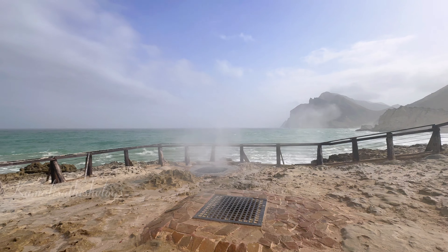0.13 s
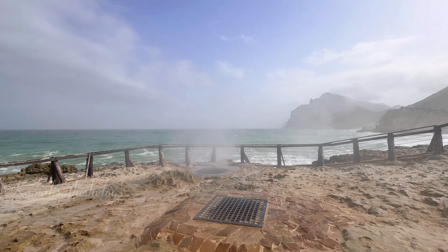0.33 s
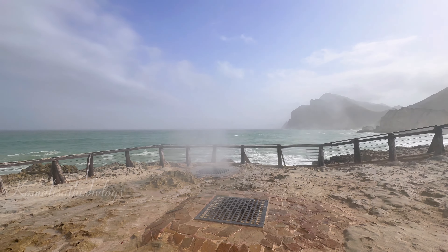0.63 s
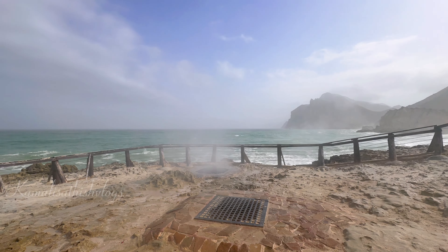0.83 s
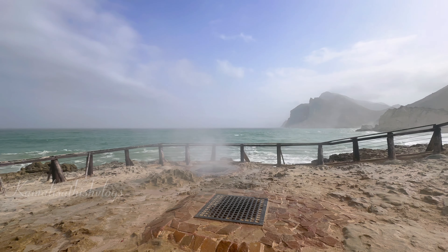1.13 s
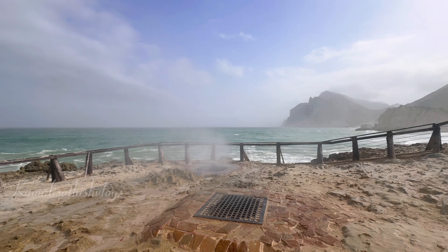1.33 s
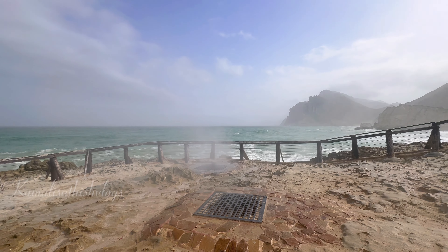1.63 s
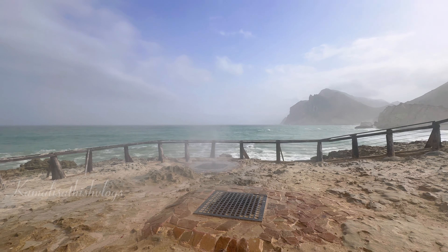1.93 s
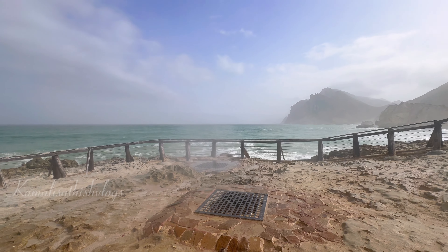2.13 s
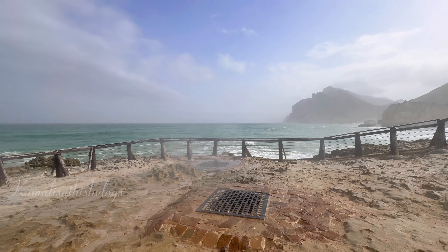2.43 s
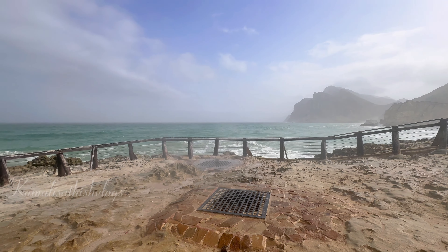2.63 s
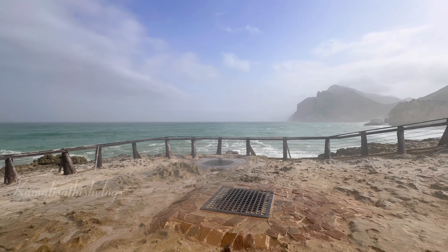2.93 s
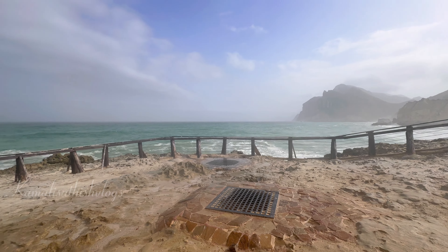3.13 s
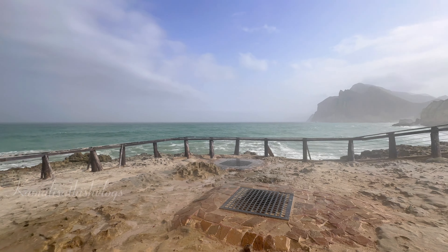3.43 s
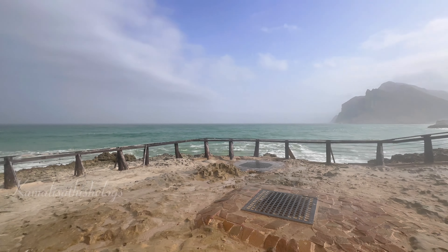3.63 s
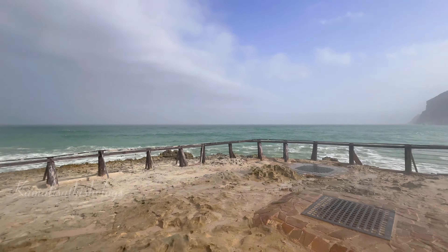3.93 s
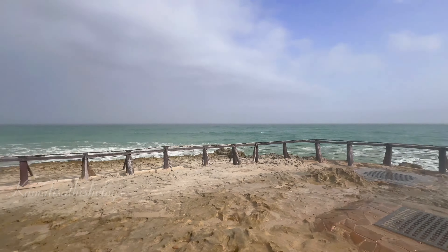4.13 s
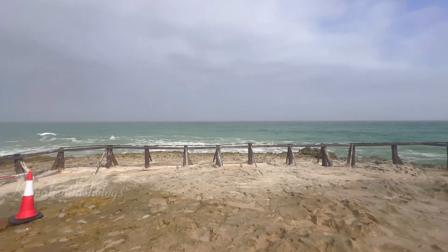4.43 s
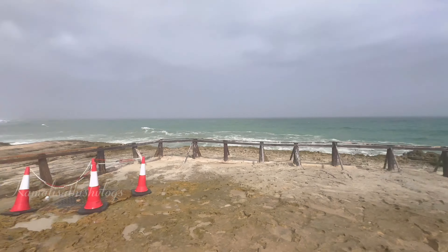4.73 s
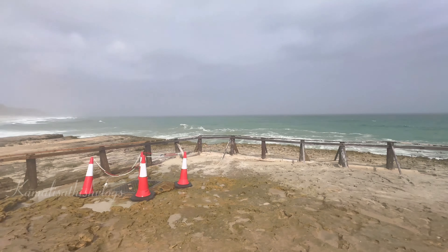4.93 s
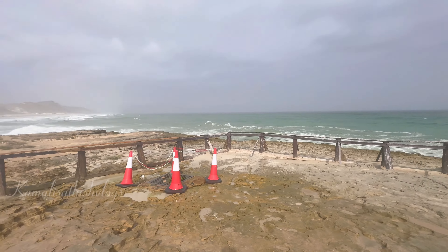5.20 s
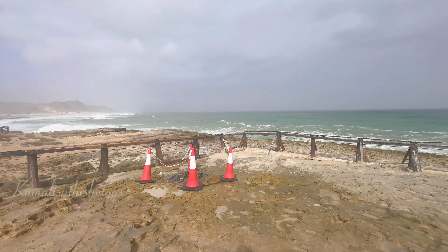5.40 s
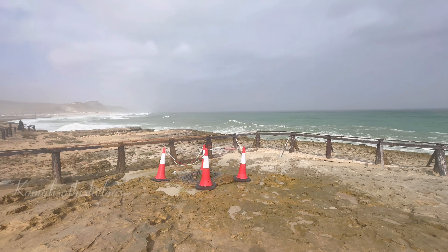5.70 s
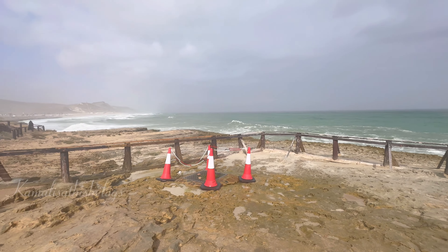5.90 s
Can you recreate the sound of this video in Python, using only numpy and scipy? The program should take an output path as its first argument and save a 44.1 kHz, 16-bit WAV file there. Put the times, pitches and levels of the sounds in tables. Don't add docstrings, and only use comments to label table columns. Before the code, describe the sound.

A roaring low boom and broadband hiss start immediately, dip briefly, then hold loud and overloaded for over a second. The flow collapses into a lull, answered by a shorter hollow whoosh and bumpy thuds from waves under the rock. Later puffs are quieter and duller as the handheld camera microphone turns away, ending in one small airy whistle-tinged puff and near silence. Mono, close, open air.

```python
import sys
import numpy as np
from scipy import signal
from scipy.fft import rfft, irfft, next_fast_len
from scipy.io import wavfile
from scipy.ndimage import uniform_filter1d, map_coordinates

SR = 44100
rng = np.random.default_rng(int(sys.argv[2]) if len(sys.argv) > 2 else 0)


def unload_wav(signal):
    wavfile.write(
        sys.argv[1],
        SR,
        np.round(np.clip(np.atleast_2d(signal).T, -1, 1) * 32767).astype(np.int16),
    )


def field_ratio(decibels):
    return 10 ** (np.asarray(decibels, dtype=float) / 20)


N = 267201
FRAME, HOP = 1024, 512
SLAM_S, SPURT_S = 0.034, 0.066
AIM_HZ = 7200

# time [s], boom level [dB].
PRESSURE_DB = [(0, -12.5), (.12, -13), (.36, -19.5), (.52, -11), (1.72, -11.5), (1.94, -24), (2.09, -27),
               (2.4, -14), (2.6, -15.5), (2.95, -19.5), (3.3, -24), (3.9, -28.5), (4.28, -27), (4.5, -35),
               (4.74, -24), (5.28, -23), (5.4, -30.5), (6.06, -38.5)]
# time [s], hiss colour [0 blast, 1 puff, 2 lull, 3 last puff, 4 end].
TURN_COLOUR = [(0, -0.5), (1.9, 0.5), (2.3, 1.5), (2.62, 1), (3.12, 2.5), (4.7, 2.5), (5.4, 3.5), (5.7, 4)]
# time [s], main notch [Hz], its depth [dB], whistle re hiss [dB], cover by the hand [dB].
CAMERA_AIM = [(0, 8200, 9, -17.5, -0.5), (.3, 7700, 9, -14, 17), (.52, 7440, 11, -15, 16),
              (.7, 7400, 11, -14, 2.5), (1.9, 7800, 7, -14.5, 0.5), (2.43, 7440, 3, -16, 9),
              (2.56, 7300, 5, -7.5, 11), (2.72, 7460, 11, -10, 0), (2.92, 6830, 11, -3.5, -2),
              (3.2, 6040, 6, -17.5, 0), (3.6, 6250, 3, -12.5, 8), (3.92, 6900, -1, -15, 10),
              (4.16, 8800, 6, -11.5, 0), (4.42, 7200, 5.5, -12, 3), (4.78, 6900, 4, -10.5, 7),
              (5.15, 7040, 5, -14.5, 4), (5.6, 7600, 5, -11.5, 1), (6.06, 7200, 5, -17, 2)]


def unit(x):
    return x / np.sqrt(np.mean(np.abs(x) ** 2) + 1e-20)


def along(points, hz):
    f, v = np.transpose(points)
    return np.interp(np.log(hz + 1), np.log(f + 1), v)


def curves(rows, t):
    s, *cols = np.transpose(rows)
    return [np.interp(t, s, c) for c in cols]


def wobble(rate_hz):
    knots = rng.standard_normal(int(N * rate_hz / SR) + 4)
    return map_coordinates(knots, [np.arange(N) * rate_hz / SR])


def filtered(x, response):
    m = next_fast_len(N + SR // 2)
    return irfft(rfft(x, m) * response(np.fft.rfftfreq(m, 1 / SR)), m)[..., :N]


def slams(t, length_s):
    # time [s], extra boom [dB], extra spurt [dB], thud [dB].
    slam_rows = [(.08, 0.5, 2.5, 8.5), (.31, -2.5, 0, -0.5), (.44, 1, 0.5, -1.5), (.56, 2.5, -1.5, 3),
                 (.79, 3, 2.5, 2.5), (1.0, 0.5, 1, 2), (1.18, 2, -0.5, 1), (1.48, 0, 0, 0),
                 (2.24, 2.5, 0, -4), (2.32, -3.5, 2, 7), (2.472, 4.5, 7.5, 1), (2.56, 0, 6.5, 0),
                 (2.63, 5, 1.5, -13), (2.83, 5, 3, 9), (3.07, 8, -0.5, 8), (3.17, 5, -1.5, -2),
                 (3.45, 4.5, 0, 6), (3.67, 5.5, -1, 2), (3.86, -1.5, -4, 5.5), (3.97, -1.5, 0.5, 8),
                 (4.1, 1, -1, 4), (4.8, 1, 1.3, 7), (5.18, 4, 1.5, 3), (5.27, 2, 0.5, 6),
                 (5.55, 3, 1.5, -7)]
    s, *cols = np.transpose(slam_rows)
    grid_s = np.arange(0, N / SR, 1 / 200)
    bumps = np.array(cols) @ np.exp(-((grid_s - s[:, None]) / length_s) ** 2)
    return [np.interp(t, grid_s, b) for b in bumps]


def controls(t):
    # time [s], hiss level [dB].
    flow_rows = [(0, -23.5), (.12, -30), (.22, -38), (.45, -30), (.6, -22.5), (.95, -20.5), (1.65, -19.5),
                 (1.81, -26.5), (1.94, -41), (2.06, -47), (2.4, -37.5), (2.7, -42), (3.2, -41.5),
                 (4.12, -44.5), (4.52, -51), (4.74, -46), (5.2, -43), (6.06, -53.5)]
    boom_db = curves(PRESSURE_DB, t)[0] + slams(t, SLAM_S)[0]
    flow_db = curves(flow_rows, t)[0] + slams(t, SPURT_S)[1]
    return boom_db, flow_db


def modes(table, steep):
    def gain(f):
        return sum(field_ratio(db) / (1 + ((f * f - c * c) / (f * w + 1)) ** 2) ** steep for c, w, db in table)
    return unit(filtered(rng.standard_normal(N), gain))


def air_column(t):
    # centre [Hz], width [Hz], level [dB].
    low_blast = [(222.7, 117, -0.5), (281, 130, 1), (384, 105, -8.5)]
    low_calm = [(203, 106, -6.5), (293.5, 72, -1), (362, 59.5, -7)]
    upper_blast = [(462, 347, -2), (684, 125, -3.5)]
    upper_calm = [(527, 51, 4.5), (624, 140, 8.6)]
    top_blast = [(833.5, 70, 4), (916, 61, -8.5), (1180, 430, -13.5)]
    top_calm = [(842, 122, 5.5), (1010, 116, -4.5), (1192, 100, -8.5)]
    # time [s], level moved from second to third modes [dB], churn [dB].
    water_rows = [(0, 1, 0.5), (.2, -1.5, -4), (.36, 0.5, -7.5), (.56, -3, 1.5), (.8, 0.5, -2.5),
                  (1.35, 0, 2.5), (1.8, 0.5, 1), (2.3, 0, -1), (2.88, -2.5, 4.5), (3.03, -7, 1.5),
                  (3.35, -6.5, -1), (3.62, 3.5, -2.5), (3.86, 4.5, -1.5), (3.96, -2.5, 3.5),
                  (4.28, 4, -0.5), (4.6, 3, -1), (5.25, 3, -1), (6.06, 1, 0.5)]
    boom_db, flow_db = controls(t)
    water_db, churn_db = curves(water_rows, t)
    second_db = -0.92 + 0.5 * boom_db + 0.5 * flow_db - 0.47 * water_db + churn_db
    third_db = -6 + 0.46 * boom_db + 0.58 * flow_db + 1.56 * water_db + churn_db
    turn = curves(TURN_COLOUR, t)[0]
    calm = np.clip(turn / 1.76, 0, 1) - 0.82 * np.clip(turn - 3, 0, 1)

    def fade(blast, quiet):
        return np.sqrt(1 - calm) * modes(blast, steep=0.97) + np.sqrt(calm) * modes(quiet, steep=1.01)

    boom = field_ratio(boom_db + 0.7 * wobble(22)) * fade(low_blast, low_calm)
    second = field_ratio(second_db + 0.66 * wobble(10)) * fade(upper_blast, upper_calm)
    third = field_ratio(third_db + 0.67 * wobble(6.1)) * fade(top_blast, top_calm)
    return boom + second + third


def cave(t):
    # frequency [Hz], density [dB per Hz].
    rumble_spectrum = [(15, -61), (25, -29), (63, -4.5), (190, 4), (250, -35), (420, -120)]
    # time [s], rumble level [dB].
    swell_rows = [(0, -20), (.3, -20), (.9, -13.5), (1.75, -26), (2.0, -33), (3.3, -36), (4.1, -31.5),
                  (4.9, -38), (6.06, -30.5)]
    level_db = curves(swell_rows, t)[0] + 0.28 * curves(PRESSURE_DB, t)[0] + slams(t, SLAM_S)[2]
    rumble = filtered(rng.standard_normal(N), lambda hz: field_ratio(along(rumble_spectrum, hz)))
    return field_ratio(level_db) * unit(rumble)


def shadow(hz, s):
    # time [s], notch [Hz], depth [dB].
    high_notch = [(2.9, 10600, -1), (3.1, 10800, 3), (3.6, 11900, 8), (4.0, 12500, 9), (4.3, 12100, 10),
                  (4.65, 11000, 4), (4.9, 10800, 1)]
    # hiss colour [0-4], depth [dB].
    upper_notch_depth = [(1, 3.5), (2.3, 7), (2.55, 6), (2.9, 1.5)]
    main_hz, main_db, _, cover_db = curves(CAMERA_AIM, s)
    slide_hz = main_hz - AIM_HZ
    upper_hz = np.maximum(9900 + slide_hz, 8800)
    upper_db = curves(upper_notch_depth, curves(TURN_COLOUR, s)[0])[0]
    notches = [(4880 + 0.13 * slide_hz, cover_db, 450),  # Hz, dB, width Hz
               (main_hz, main_db, 330),
               (upper_hz, upper_db, 330),
               (*curves(high_notch, s), 330)]
    return -sum(db * np.exp(-((hz - c) / w) ** 2) for c, db, w in notches)


def patches(shape, depth_db, bins, frames):
    field = uniform_filter1d(rng.standard_normal(shape), size=bins, axis=0)
    field = uniform_filter1d(field, size=frames, axis=1)
    return field_ratio(depth_db * unit(field))


def rush(colour_db, patchy_db, streak_db):
    hz, t, z = signal.stft(rng.standard_normal(N), SR, nperseg=FRAME, noverlap=FRAME - HOP)
    gain = field_ratio(colour_db(hz[:, None], t) + shadow(hz[:, None], t))
    gain = gain / np.sqrt(np.mean(gain ** 2, axis=0))
    gain = gain * patches(z.shape, patchy_db, bins=12, frames=5)
    gain = gain * patches(z.shape, streak_db, bins=3, frames=20)
    return unit(signal.istft(z * gain, SR, nperseg=FRAME, noverlap=FRAME - HOP)[1][:N])


def blend(spectra, hz, place):
    return sum(along(s, hz) * np.clip(1 - abs(place - k), 0, 1) for k, s in enumerate(spectra))


def jet(t):
    # frequency [Hz], density [dB per Hz].
    blast = [(590, -14.5), (1000, -22.5), (1090, -15), (1250, -6), (1370, -10), (1720, 0.5), (1910, -8.5),
             (2150, -7), (2350, -1), (2850, -2.5), (3530, 1), (3790, -3), (4320, -9.5), (5200, -14),
             (6760, -75), (11400, -120)]
    puff = [(590, -39), (1000, -7), (1080, -53), (1200, -12), (1360, -23), (1600, 2), (1820, -9),
            (1990, -1.5), (3230, -8), (3580, -1), (4350, -12), (5200, -12), (6760, -42), (11400, -120)]
    lull = [(590, -34), (1000, -17), (1090, -23), (1210, -8), (1360, -11), (2170, 0.5), (2400, -12),
            (2660, 0), (3080, -16), (3490, -2.5), (4080, -20), (5200, -12), (6760, -51), (11400, -120)]
    last_puff = [(590, -62), (1000, 1.5), (1350, -34), (1490, -10), (1600, -28), (1750, -13), (1890, -17),
                 (2500, -10.5), (2700, -15.5), (3210, -13), (3320, -17), (3580, -30.5), (4350, -16.5),
                 (5200, -33), (6760, -63), (11400, -120)]
    dying = [(590, -33), (1000, 1.5), (1140, -7), (1300, -13), (2270, -12), (3190, -8), (3710, -20),
             (4410, -15.5), (5200, -28.5), (6760, -62), (11400, -120)]
    # frequency [Hz], density [dB per Hz].
    spray_weak = [(4120, -28), (7000, 21), (7760, -14), (8800, 1), (9280, 6), (10700, -30), (12600, -20),
                  (15500, -24)]
    spray_near = [(4120, -41), (7000, -4), (7560, -12), (8540, 1), (10300, -5.5), (11600, -5.5),
                  (15500, -22)]
    spray_far = [(4120, -22), (7000, -2.5), (8700, -4.5), (10400, -8), (11600, -13), (14000, -19),
                 (15500, -30)]
    # time [s], spray colour [0 weak, 1 near, 2 far].
    spray_turn = [(.1, 6), (.25, 1.8), (.52, 0.5), (.65, 0.8), (1.9, 2), (2.5, 1.6), (3.3, 1.65),
                  (4.0, 6.5)]

    def hiss_colour(hz, s):
        turn = curves(TURN_COLOUR, s)[0]
        roar_db = 0.66 + 0.32 * slams(s, SPURT_S)[1] - 0.18 * curves(CAMERA_AIM, s)[3]
        sag_db = np.minimum(controls(s)[1] + 26, 0)
        roar_db = roar_db + 0.35 * sag_db * np.clip(1 - 2 * turn, 0, 1)
        return blend([blast, puff, lull, last_puff, dying], hz, turn) + roar_db / (1 + (hz / 1900) ** 8)

    def whistle_colour(hz, s):
        main_hz, _, loud_db, cover_db = curves(CAMERA_AIM, s)
        centre_hz = 5990 + 0.6 * (np.minimum(main_hz, 8900) - AIM_HZ)
        lift_db = 14.5 + 0.75 * loud_db + 0.45 * cover_db
        width_hz = np.interp(curves(TURN_COLOUR, s)[0], [0, 1, 2, 4], [1300, 900, 600, 500])
        below = np.clip(4900 / (hz + 1) - 1, 0, 3) * 6
        above = np.clip(hz / (centre_hz + 1570) - 1, 0, 3) * 4
        return -40 * (below + above) - lift_db * np.minimum(((hz - centre_hz) / width_hz) ** 2, 1.3)

    def spray_colour(hz, s):
        return blend([spray_weak, spray_near, spray_far], hz, np.clip(curves(spray_turn, s)[0], 0, 2))

    hiss_db = controls(t)[1]
    main_hz, _, whistle_db, _ = curves(CAMERA_AIM, t)
    spray_db = -14 - 0.64 * slams(t, SPURT_S)[1] + 0.26 * whistle_db
    spray_db = spray_db + 1.8 * (main_hz / AIM_HZ - 1) * 7.6
    hiss = rush(hiss_colour, patchy_db=0.3, streak_db=1.3)
    whistle = rush(whistle_colour, patchy_db=0.5, streak_db=3.5)
    spray = rush(spray_colour, patchy_db=0.35, streak_db=0.6)
    flutter = field_ratio(0.84 * wobble(35))
    return field_ratio(hiss_db) * flutter * (hiss + field_ratio(whistle_db) * whistle + field_ratio(spray_db) * spray)


def grate(t):
    # time [s], level [dB].
    gap_rows = [
        (5.05, -65),
        (5.13, -47.5),
        (5.22, -43),
        (5.31, -46),
        (5.4, -63),
        (5.48, -65),
        (5.535, -53),
        (5.6, -71),
    ]
    gate = (t > gap_rows[0][0]) & (t < gap_rows[-1][0])
    bars = [(3180, 260, -2), (2500, 200, -9)]  # Hz, width Hz, dB
    return field_ratio(curves(gap_rows, t)[0]) * gate * modes(bars, steep=1.1)


def scene():
    t = np.arange(N) / SR
    return (air_column(t) + cave(t) + jet(t) + grate(t))[None]


def thin_out(x):
    # frequency [Hz], faintest level kept [dB].
    faintest = [(13000, -112), (13800, -105), (14500, -101), (15200, -97)]
    hz, t, z = signal.stft(x, SR, nperseg=2 * FRAME, noverlap=FRAME)
    level = np.abs(z[:-1]).reshape(-1, 16, len(t)).mean(axis=1)
    level = np.repeat(level, 16, axis=0)
    edge_hz = np.repeat(hz[:-1:16], 16)[:, None]
    keep = (level > field_ratio(along(faintest, edge_hz))) | (edge_hz < 13000)
    z = np.vstack([z[:-1] * keep, z[-1:]])
    return signal.istft(z, SR, nperseg=2 * FRAME, noverlap=FRAME)[1][:N]


def low_pass(x):
    return signal.sosfilt(signal.butter(12, 15640, fs=SR, output="sos"), x)


def record(dry):
    clipped = dry / (1 + abs(dry / 1.07) ** 6) ** (1 / 6)
    hiss = field_ratio(-82) * filtered(rng.standard_normal(N), lambda hz: hz < 15150)
    mix = thin_out(clipped[0] + hiss)[None] + field_ratio(-9) * hiss[::-1]
    mix = filtered(mix, lambda hz: hz < 15650)
    return low_pass(mix)


dry = scene()
out = record(dry)
unload_wav(out)
```